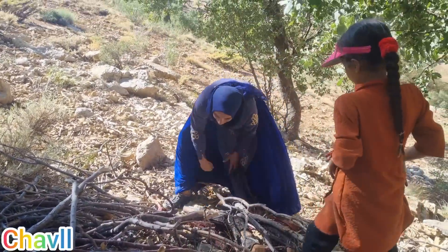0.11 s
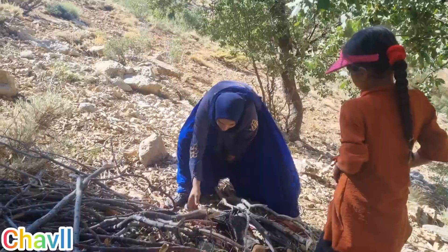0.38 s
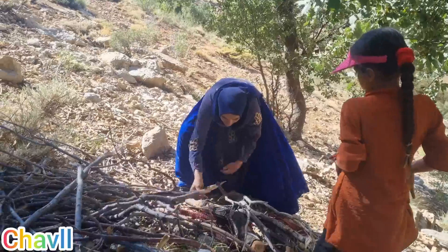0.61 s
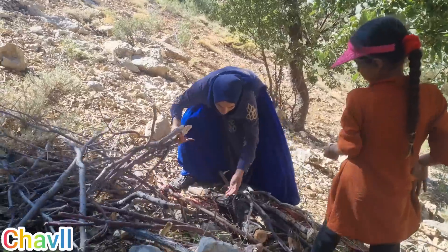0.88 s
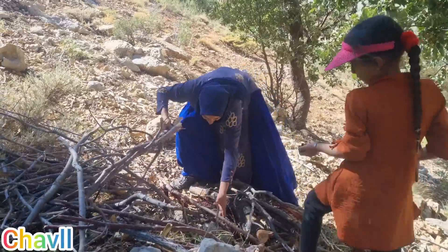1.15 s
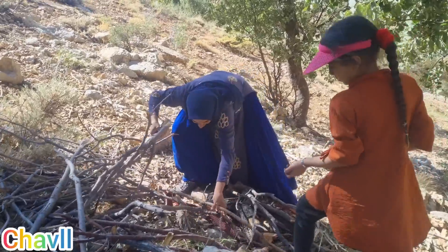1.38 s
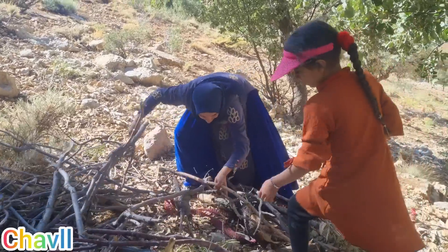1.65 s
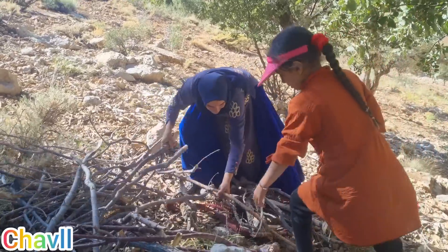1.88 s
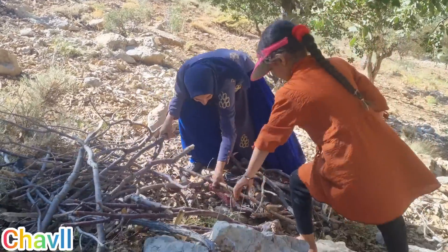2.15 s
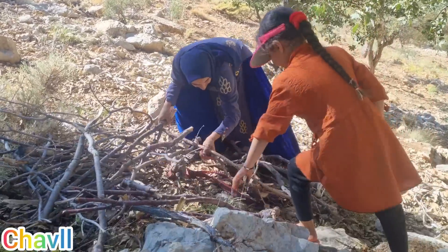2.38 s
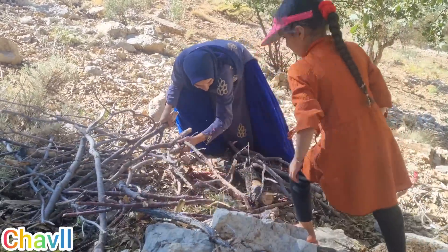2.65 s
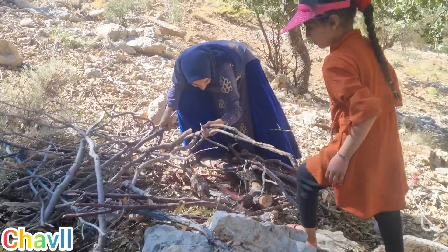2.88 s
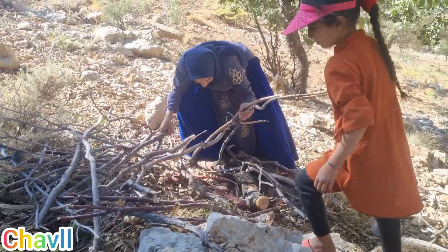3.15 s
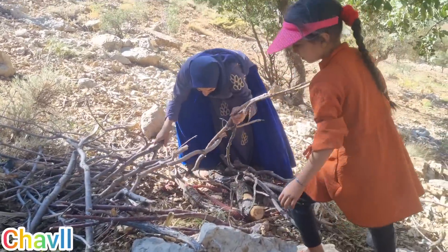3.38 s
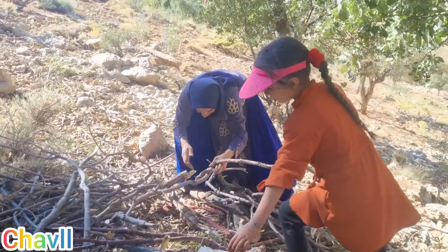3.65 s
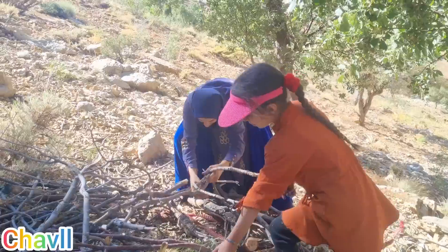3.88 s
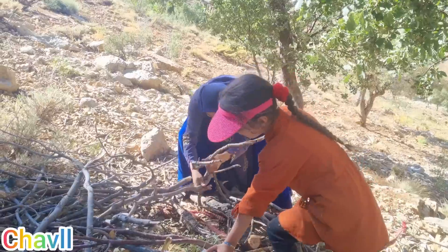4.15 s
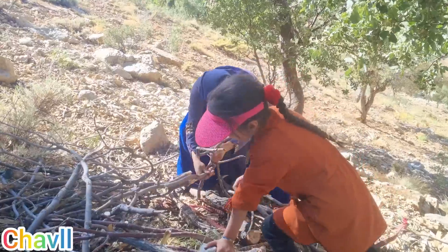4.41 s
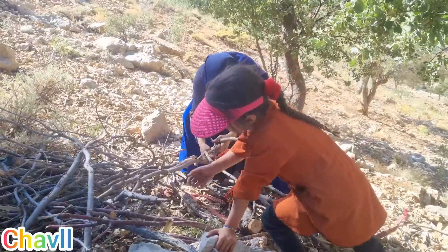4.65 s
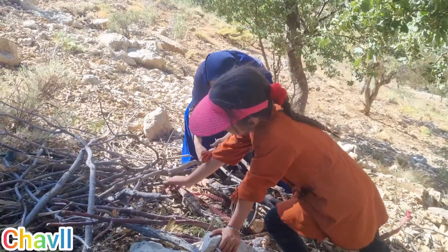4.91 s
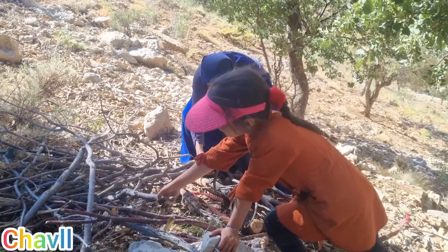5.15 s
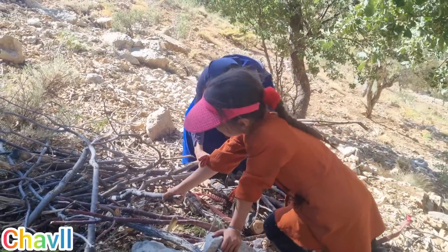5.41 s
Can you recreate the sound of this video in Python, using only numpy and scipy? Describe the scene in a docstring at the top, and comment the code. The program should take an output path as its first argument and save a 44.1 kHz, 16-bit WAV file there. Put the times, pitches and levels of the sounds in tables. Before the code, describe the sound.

Outdoors, a heavy low wind rumble buffets the stereo microphone in the first half second. Then dry branches are dragged from a pile a few steps away: bright rustling, scraping and clusters of sharp twig snaps, densest from one and a half to three seconds and again after four. Another strong gust thumps near the end, a branch creaks briefly, and the pile goes almost quiet over faint hiss.

```python
"""Gusts of wind buffet two microphone ports, each in its own way, and then dry branches are dragged
out of a brush pile in the open air: twigs scrape, rustle, tick and snap a few steps away.
Wind is shaped noise, scattered wavelets and single pressure swings; rustle is noise gated by contacts.
Snaps are decaying noise bursts, partly through a resonance; a creak is uneven noise through resonances."""
import sys
import numpy as np
from scipy import signal
from scipy.fft import rfft, irfft, next_fast_len
from scipy.io import wavfile
from scipy.ndimage import uniform_filter1d, map_coordinates

SR = 44100
rng = np.random.default_rng(int(sys.argv[2]) if len(sys.argv) > 2 else 0)


def inscribe(sig):
    """Save sig as 16-bit PCM at rate SR to the path in sys.argv[1].

    A 1-D sig is mono; a 2-D sig holds one channel per row.
    Samples are clipped to [-1, 1] before scaling.
    """
    pcm = np.round(np.clip(np.atleast_2d(sig).T, -1, 1) * 32767)
    wavfile.write(sys.argv[1], SR, pcm.astype(np.int16))


def invert_db(x):
    """Field ratio 10**(x/20) for x, a level in decibels (scalar or array-like)."""
    u = np.asarray(x, float) / 20
    return 10 ** u


N = 243873

# spectra of twigs, thick limbs and bark: freq_hz, density_db (per Hz, relative)
TWIG_SPECTRUM = [(1200, -31), (1900, -9.5), (2600, -3), (4000, -3), (6000, 0.5), (8200, 1.5), (9300, -9),
                 (13000, -56)]
LIMB_SPECTRUM = [(300, -64), (500, 2), (700, 2), (1050, 0), (1400, -3), (1600, 3.5), (1900, 0), (2600, -14)]
BARK_SPECTRUM = [(5000, -53), (8000, 4.5), (10500, 5), (13000, 7.5), (15500, 6.5), (16200, -36)]


def unit(x):
    """Scaled to rms 1."""
    return x / np.sqrt(np.mean(x ** 2) + 1e-20)


def along(points, hz):
    """(Hz, value) points interpolated on a log frequency axis."""
    point_hz, value = np.transpose(points)
    return np.interp(np.log(hz + 1), np.log(point_hz + 1), value)


def curves(rows):
    """One value per sample for each column after the time."""
    s, *cols = np.transpose(rows)
    return [np.interp(np.arange(N) / SR, s, c) for c in cols]


def wobble(knots_per_s):
    """Smooth random curve."""
    knots = rng.standard_normal(N // 100)
    return map_coordinates(knots, [np.arange(N) * knots_per_s / SR])


def filtered(x, response):
    """x times a complex response of frequency."""
    m = next_fast_len(N + 8192)
    hz = np.fft.rfftfreq(m, 1 / SR)
    return irfft(rfft(x, m) * response(hz), m)[..., :N]


def coloured(x, spectrum):
    """x given a spectrum, at rms 1."""
    return unit(filtered(x, lambda hz: invert_db(along(spectrum, hz))))


def resonance(hz, centre_hz, width_hz):
    """Causal response of one mode."""
    damping = 1j * hz * width_hz
    return damping / (centre_hz ** 2 - hz ** 2 + damping)


def contacts(count, spread_db, life_ms):
    """Envelope of scattered touches with fast rise and exponential decay; a few are much stronger."""
    draw = rng.random((count, 2))
    size = invert_db(np.minimum(-spread_db * np.log(draw[:, 1] + 1e-9), 4 * spread_db))
    starts = np.bincount((draw[:, 0] * N).astype(int), size ** 2, N)
    ms = np.arange(600) * 1000 / SR
    fade = (1 - np.exp(-ms / 0.2)) ** 2 * np.exp(-ms / life_ms)
    power = np.abs(signal.fftconvolve(starts, fade)[:N])
    return unit(np.sqrt(power))


def grains(count, pitch_hz, octaves, cycles, spread_db, size):
    """Two tracks of scattered wavelets: shared times, pitches and strengths, separate phases."""
    even, bell = rng.random((2, count, 3)), rng.standard_normal((2, count, 1))
    even[1, :, 0::2], bell[1] = even[0, :, 0::2], bell[0]
    grain_hz = np.minimum(pitch_hz * 2 ** (octaves * bell), SR / 3)
    turns = np.arange(size) / SR * grain_hz
    strength_db = np.minimum(-spread_db * np.log(even[..., 2:] + 1e-9), 2.78 * spread_db)
    swing = np.sin(2 * np.pi * (turns + even[..., 1:2]))
    wave = invert_db(strength_db) * turns * np.exp(-turns / cycles) * swing
    at = (even[0, :, :1] * N).astype(int) + np.arange(size)
    return unit(np.array([np.bincount(at.ravel(), w.ravel(), N + size)[:N] for w in wave]))


def patches(pair, depth_db):
    """Now these twigs sound, now those: random gain over patches of time and frequency."""
    z = signal.stft(pair, nperseg=256)[2]
    field = rng.standard_normal(z.shape[1:])
    field = uniform_filter1d(field, size=5, axis=0)
    field = uniform_filter1d(field, size=7, axis=1)
    return signal.istft(z * invert_db(depth_db * unit(field)), nperseg=256)[1][:, :N]


def hiss():
    """Smooth, almost steady open-air noise, unrelated on the two sides."""
    # freq_hz, density_db (per Hz, relative)
    hiss_spectrum = [(590, -51), (1000, -11), (2810, -15), (3270, -11), (4570, -7), (7350, -2.5),
                     (16000, -11.5)]
    level_db = -62.5 + 0.18 * wobble(2.84)
    return invert_db(level_db) * coloured(rng.standard_normal((2, N)), hiss_spectrum)


def puffs():
    """Gain of sudden low puffs: each rises fast to full, holds and falls away."""
    # full_at_s, gain_db, hold_s
    puff_rows = [(0.051,-36,0.022),(1.003,-38.5,0.01),(1.326,-34,0.0066),(1.438,-50,0.02),(3.065,-51.5,0.0077),(3.214,-39.5,0.0032),(3.3,-54,0.013),(3.595,-25.5,0.0093),(4.486,-41,.03),(4.63,-32,0.16)]
    rise_db_per_s, fall_db_per_s = 700, 312
    t = np.arange(N) / SR
    gain = 0
    for s, db, hold_s in puff_rows:
        rise_db = rise_db_per_s * np.clip(s - t, 0, 1)
        fall_db = fall_db_per_s * np.clip(t - s - hold_s, 0, 1)
        gain = gain + invert_db(db - rise_db - fall_db)
    return gain


def slaps():
    """Single big eddies: about one pressure swing each, its phase different at each port."""
    # centre_s, level_db, pitch_hz
    slap_rows = [(0.343,-20,120),(0.367,-16,80),(0.415,-19,237),(0.433,-22,80),(0.49,-19.5,90),(2.315,-36,80),(2.415,-31,69),(2.44,-28,80.6),(2.548,-28,83),
                 (4.162,-31.5,84),(4.188,-38,110),(4.265,-41.5,87),(4.289,-37,89),(4.643,-19,89.5),(4.694,-14.5,95),(4.728,-25,70),(4.761,-17.5,95),
                 (4.814,-21.5,95),(4.856,-26,75),(4.885,-28,75),(5.049,-26.5,108),(5.106,-31,83.6),(5.246,-37,87)]
    half_width_cycles = 0.45  # to 1/e
    out, t = np.zeros((2, N)), np.arange(-2048, 2048) / SR
    phases = rng.random((len(slap_rows), 2, 1))
    for (s, db, pitch_hz), phase in zip(slap_rows, phases):
        turns = t * pitch_hz
        swing = np.exp(-(turns / half_width_cycles) ** 2) * np.cos(2 * np.pi * (turns + phase))
        out[:, round((s + t[0]) * SR):][:, :len(t)] += invert_db(db) * swing
    return out


def wind():
    """Single eddies thump each port over a lumpy roar; small eddies flutter higher."""
    # slow wind strength: time_s, gain_db
    wind_strength = [(0.0,-41),(0.13,-45.5),(0.3,-33),(0.42,-31),(0.65,-49),(0.95,-46),(1.1,-55),(1.3,-59),(1.55,-41),(1.7,-54.5),(1.85,-46),(2.28,-58),(2.45,-37.5),(2.6,-46),(3.0,-70),(3.48,-33.5),(3.54,-65.5),(3.7,-42),(4.12,-57),(4.2,-39.5),(4.45,-58.5),(4.6,-44),(5.04,-37.5),(5.34,-59),(5.53,-50)]
    # flutter against wind: time_s, relative_db
    flutter_share = [(0.0,-16),(0.42,-8.5),(1.1,-17),(1.7,-11.5),(2.3,-15.5),(2.9,3),(3.4,-17),(4.1,-20),(4.8,-13),(5.3,-19),(5.53,-17)]
    # port the gust presses on: time_s, left_minus_right_db
    gust_side = [(0.0,-3.5),(0.38,-2.5),(0.71,-4.5),(3.82,-1.5),(4.13,-7),(5.19,6)]
    # freq_hz, density_db (per Hz, relative)
    buffet_spectrum = [(15, -45), (30, -5), (60, 2), (120, -2), (180, -10), (260, -10.5), (400, -63)]
    flutter_spectrum = [(120, 0.5), (200, -1.5), (320, -3.5), (450, -10), (650, -13.5), (1000, -69),
                        (1500, -97)]

    def port(**kind):
        return np.array([grains(**kind)[0], grains(**kind)[0]])

    wind_db, puff = curves(wind_strength)[0], puffs()
    buffet_gain = invert_db(wind_db) + puff
    flutter_gain = invert_db(wind_db + curves(flutter_share)[0]) + invert_db(-24.5) * puff + invert_db(-82)  # last: floor
    lumps = np.array([wobble(22.015), wobble(21.81)])
    thumps = port(count=420, pitch_hz=94.8, octaves=0.6, cycles=0.18, spread_db=5.5, size=2500)
    flaps = port(count=900, pitch_hz=299.7, octaves=0.45, cycles=0.65, spread_db=6.5, size=900)
    roar = rng.standard_normal((2, 2, N))
    buffet = unit(invert_db(1.9 * lumps) * coloured(thumps + 1.5 * roar[0], buffet_spectrum))
    flutter = unit(invert_db(2.3 * lumps) * coloured(flaps + 3 * roar[1], flutter_spectrum))
    flutter = unit(flutter + 0.27 * flutter[::-1])  # small eddies often brush both ports
    side_db = curves(gust_side)[0] * np.array([[.5], [-.5]])
    return invert_db(0.3 + side_db) * (buffet_gain * buffet + flutter_gain * flutter + slaps())


def creak():
    """One branch creaks along another: dense, uneven slips over a steady rub, through its resonances."""
    # time_s, level_db
    creak_level = [(4.865, -63), (4.89, -54.5), (4.935, -48.5), (4.955, -71), (4.98, -47.5), (5.01, -53.5),
                   (5.05, -52), (5.07, -65)]
    # centre_hz, width_hz, gain_db
    branch_modes = [(1560, 180, 6.5), (2670, 150, -5), (3250, 870, 3.5), (4000, 400, -8)]

    def wood(hz):
        return sum((-1) ** k * invert_db(db) * resonance(hz, centre_hz, width_hz) ** 2
                   for k, (centre_hz, width_hz, db) in enumerate(branch_modes))

    slips = .9 + contacts(count=900, spread_db=5.0, life_ms=1.1)
    rub = unit(filtered(slips * rng.standard_normal((2, N)), wood))
    first_s, last_s = creak_level[0][0], creak_level[-1][0]
    sounding = np.interp(np.arange(N) / SR, [first_s, last_s], [1, 1], 0, 0)
    return sounding * invert_db(curves(creak_level)[0]) * rub


def snaps():
    """A break rings the twig at its pitch, cracks fibres broadly, has a sharp edge and scatters in the pile."""
    # twigs that break or strike: start_s, level_db, pitch_hz, edge_db (relative sharpness)
    snap_rows = [(0.594,-45.5,7400,6),(0.6108,-29,5170,-12),(0.638,-30.5,4430,-23),(0.734,-35,5000,-10),(0.789,-36,5170,-20),(0.804,-45,13000,-3),(0.847,-37,10500,-2),(0.859,-21.5,7200,2.5),(0.8732,-17.5,5960,-2.5),
                 (1.055,-33,8900,2),(1.078,-30.5,5460,-23),(1.3334,-31,3520,-4.5),(1.5336,-23,6160,-16),(1.5488,-19.5,7650,-3),
                 (1.5888,-23,5940,0),(1.5952,-24,7600,-7),(1.622,-16.5,3370,-11),(1.7418,-31,4800,-13),(1.7765,-22,4800,-17.5),
                 (1.8195,-26.5,4300,-17),(1.8767,-29.5,4300,-41),(2.0022,-15.5,7740,-15.5),(2.335,-35,2330,-1),(2.4002,-34.5,6040,-7),
                 (2.422,-29,3770,-3.5),(2.5004,-30,7850,-13),(2.536,-34.5,3420,1),(2.556,-35,4500,-5),(2.587,-33,8200,-27),(2.598,-31,1020,-21),(2.6228,-28,3480,-15),(2.648,-28,8200,-22),(2.708,-28.5,7860,-23),(2.73,-27.5,4700,-31),(2.818,-28.5,3200,-27),(2.831,-29.5,4000,-26),
                 (2.8623,-23.5,8000,-20),(2.95,-28.5,7660,-13),(3.0392,-27,6070,-12),(3.566,-28,4830,-13),(3.592,-24,4960,-16),
                 (3.6362,-24,4900,-12),(4.123,-38,3570,-18),(4.156,-32.5,3150,-22),(4.169,-29,3640,-11),(4.182,-33,7440,-27),(4.2085,-17.5,7900,-7),
                 (4.2163,-21,2670,-12),(4.2404,-23.5,5430,-11),(4.271,-34,7900,-10),(4.3428,-34,8000,-14),(4.3472,-27.5,4000,-19),(4.371,-27.5,4240,-29),(4.389,-32,4000,-21),(4.4374,-35,5130,-20),(4.471,-43,2980,-23),(4.735,-46,6500,-2),(4.975,-38,5650,-19),(5.031,-37.5,3740,-22),
                 (5.0706,-22,3210,-85),(5.12,-44,5700,-9),(5.2016,-43,5350,-9),(5.362,-51,3700,-12),(5.48,-47.5,3650,-5.5)]
    ring_s, crack_s, edge_s, scatter_s = .0011, .0014, .0006, .0085  # decay to 1/e
    out, t = np.zeros((2, N + SR)), np.arange(4096) / SR
    hz = np.fft.rfftfreq(len(t), 1 / SR)
    crack_colour = invert_db(along(TWIG_SPECTRUM, hz)) + invert_db(along(LIMB_SPECTRUM, hz) - 15)
    edge_colour = invert_db(along(BARK_SPECTRUM, hz))

    def fade(life_s, scatter_db, rise_s=0.0002):
        decay = np.exp(-t / life_s) + invert_db(scatter_db) * np.exp(-t / scatter_s)
        return (1 - np.exp(-t / rise_s)) * decay

    for s, db, pitch_hz, edge_db in snap_rows:
        noise = rng.standard_normal((3, 2, len(t)))
        # sharper breaks rise faster and crack more
        strike = noise[0] * fade(ring_s, -8.5 + 0.22 * edge_db, 0.00037 * invert_db(-.18 * edge_db))
        struck = irfft(rfft(strike) * resonance(hz, pitch_hz, 220 + .13 * pitch_hz) ** 2)
        ring = struck / np.abs(struck).max()
        crack_fade = fade(crack_s, -5.0, 0.00069 * invert_db(-.15 * edge_db))
        crack = crack_fade * unit(irfft(rfft(noise[1]) * crack_colour))
        edge = fade(edge_s, -15.5) * unit(irfft(rfft(noise[2]) * edge_colour))
        snap = invert_db(-0.5) * ring + invert_db(-6 + 0.15 * edge_db) * crack + invert_db(edge_db + 9.0) * edge
        out[:, round(s * SR):][:, :len(t)] += invert_db(db) * snap
    return out[:, :N]


def drag():
    """Small touches and dry crackles of twigs over sliding; each layer also has touches of its own."""
    # how hard the branches are dragged: time_s, twig_gain_db
    drag_strength = [(0.0,-53.5),(0.3,-65),(0.56,-60.5),(0.64,-51),(0.75,-40.5),(0.94,-45),(1.0,-56.5),(1.09,-52),(1.26,-56.5),(1.44,-54),(1.53,-39.5),(1.62,-36.5),(1.7,-46),(1.89,-44.5),(1.97,-51.5),(2.08,-51),(2.19,-50),(2.23,-49.5),(2.415,-48.5),(2.426,-40),(2.64,-42.5),(2.69,-50),(2.84,-43.5),(3.01,-55),(3.06,-48),(3.48,-64),(3.58,-42.5),(3.67,-50),(3.77,-51.5),(3.88,-62),(4.13,-60),(4.22,-43.5),(4.33,-59),(4.35,-50),(4.46,-51.5),(4.55,-65),(4.6,-56),(4.77,-56),(4.97,-50.5),(5.17,-67.5),(5.53,-71.5)]
    # lower rub of thick limbs against the rustle: time_s, relative_db
    limb_share = [(0.0,-12.5),(0.85,-12.5),(1.5,-12),(2.2,-13),(2.6,-8.5),(3.2,-11),(3.7,-10.5),(4.4,-14),(5.0,-11.5),(5.53,-7)]
    twig_db, limb_db, bark_db = curves(drag_strength)[0], curves(limb_share)[0], -3.5
    shared = contacts(count=1100, spread_db=5, life_ms=2.2)
    jerks = invert_db(1.84 * wobble(30))  # the branch catches and slips as it is pulled
    crackle = grains(count=6000, pitch_hz=4410, octaves=0.499, cycles=3.9, spread_db=3.0, size=200)
    # spectrum, relative_db, steady bed, own touches, crackle
    kinds = ((TWIG_SPECTRUM, 0, .5, .4, .6),
             (LIMB_SPECTRUM, limb_db, 1.15, .6, 0),
             (BARK_SPECTRUM, bark_db, .5, .55, 0))
    layers = 0
    for spectrum, relative_db, bed, own, ticks in kinds:
        own_touches = contacts(count=900, spread_db=3.0, life_ms=1.0)
        touch = unit(bed + 0.58 * shared + own * own_touches)
        sliding = touch * patches(rng.standard_normal((2, N)), depth_db=2.0)
        gain = invert_db(twig_db + relative_db + 0.081 * wobble(9.2))
        layers = layers + gain * coloured(sliding + ticks * crackle, spectrum)
    return jerks * layers


def ports(pair):
    """The ports hear the pile along different paths: partly alike, with phase and level differences."""
    # freq_hz, left_lead_rad
    lead_points = [(0, -36), (860, 1.3), (1500, 1.14), (2240, 6), (3960, 12.5), (5340, 11.5), (6980, 16.5),
                   (16000, 17)]
    # freq_hz, left_minus_right_db
    lean_points = [(500, 3.5), (1500, 1.5), (3000, -0.5), (6000, -1.5), (9000, -2.5), (15000, -4)]
    # freq_hz, likeness (0 to 1)
    alike_points = [(500, 1), (1500, 0.51), (4000, 0.14), (12000, 0.19)]

    def mix(hz):
        turn = np.arccos(np.clip(along(alike_points, hz), 0, 1)) / 2
        return np.array([np.cos(turn), np.sin(turn)])

    def skew(hz):
        return np.exp(.5j * along(lead_points, hz)) * invert_db(along(lean_points, hz) / 2)

    mid, side = filtered(pair, mix)
    left = filtered(mid + side, skew)
    right = filtered(mid - side, lambda hz: 1 / skew(hz))
    return np.array([left, right])


def scene():
    """The pile heard through both ports, under the wind and the hiss."""
    pile = drag() + creak() + snaps()
    return ports(pile) + wind() + hiss()


def roll_off(x):
    """The treble ends steeply here."""
    return signal.sosfilt(signal.butter(12, 16840, fs=SR, output="sos"), x)


def record(dry):
    """The finished two-port mix, ready to write."""
    return roll_off(dry)


dry = scene()
out = record(dry)
inscribe(out)
```